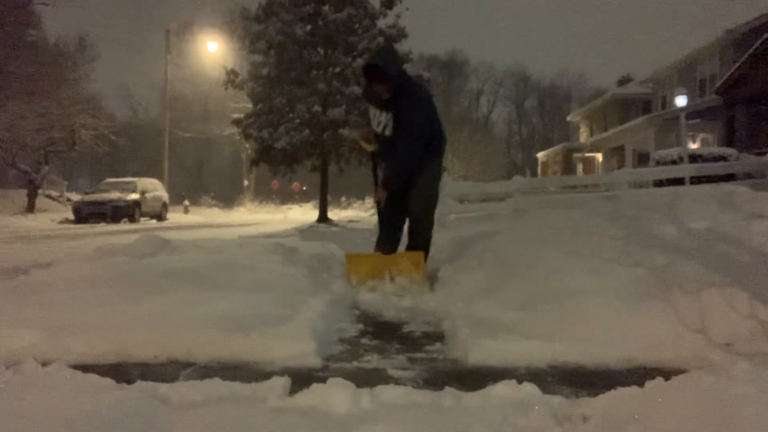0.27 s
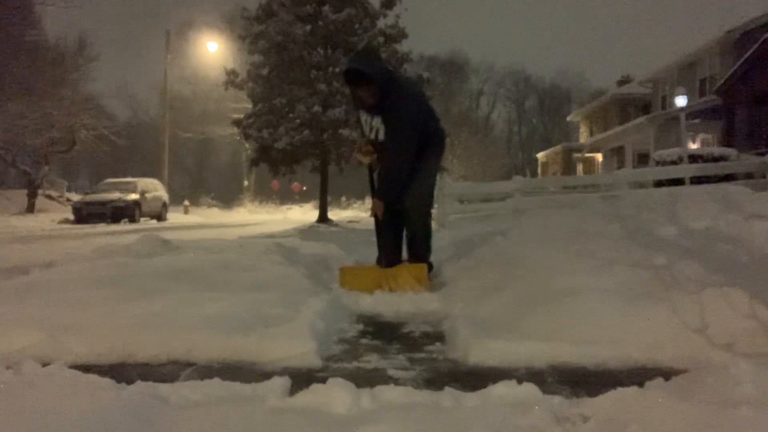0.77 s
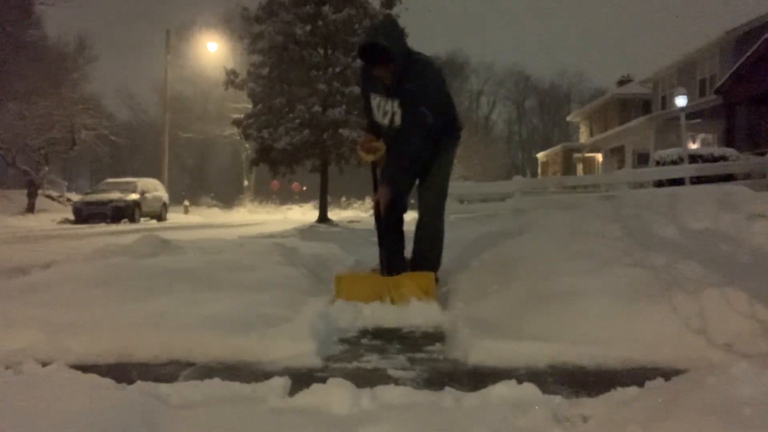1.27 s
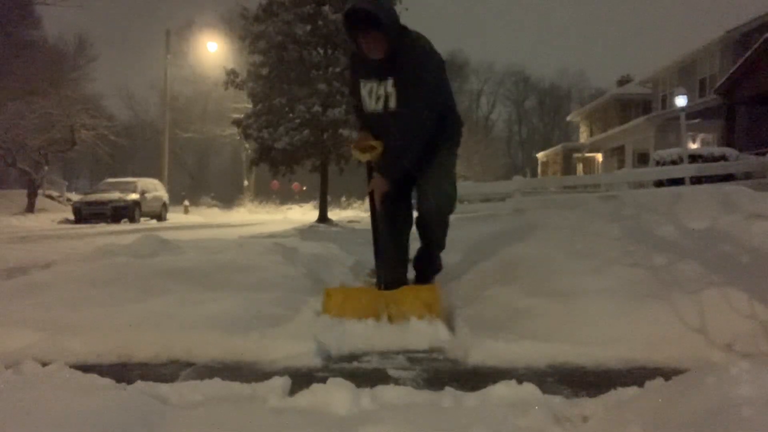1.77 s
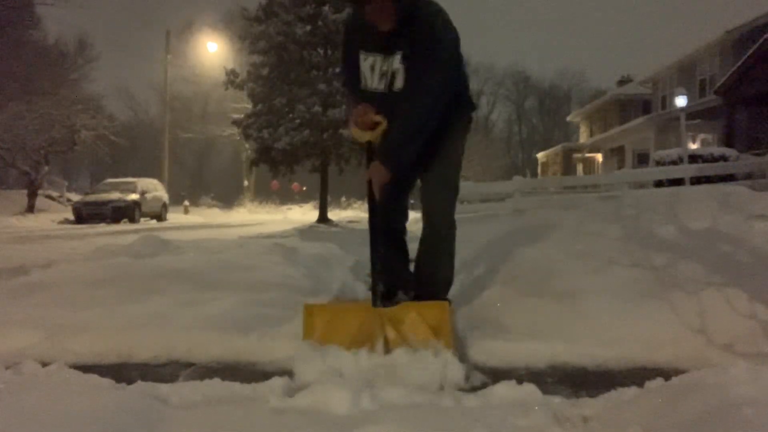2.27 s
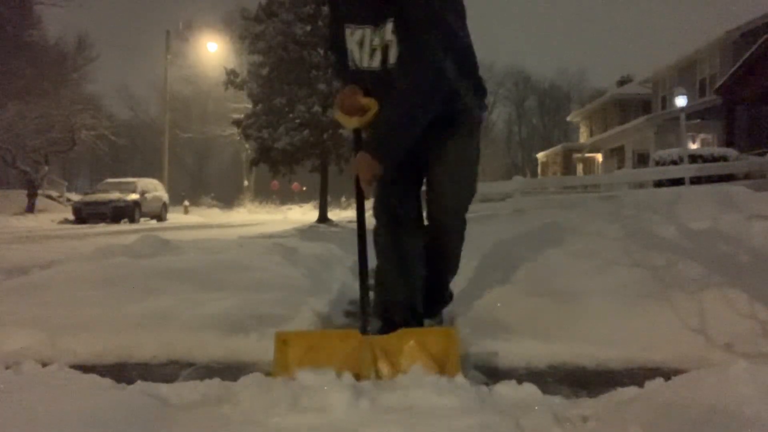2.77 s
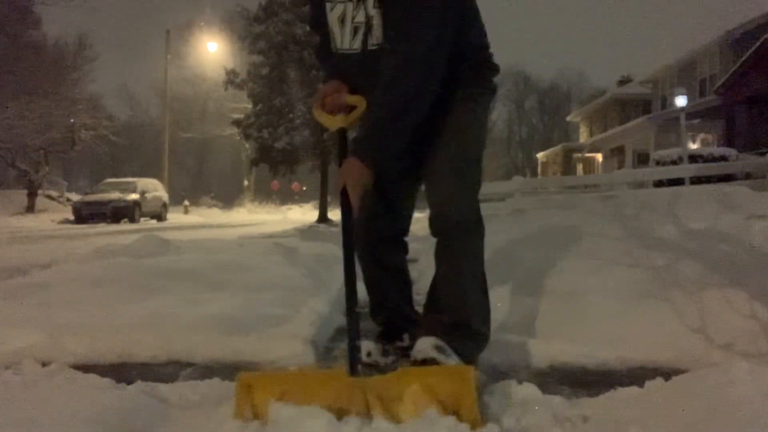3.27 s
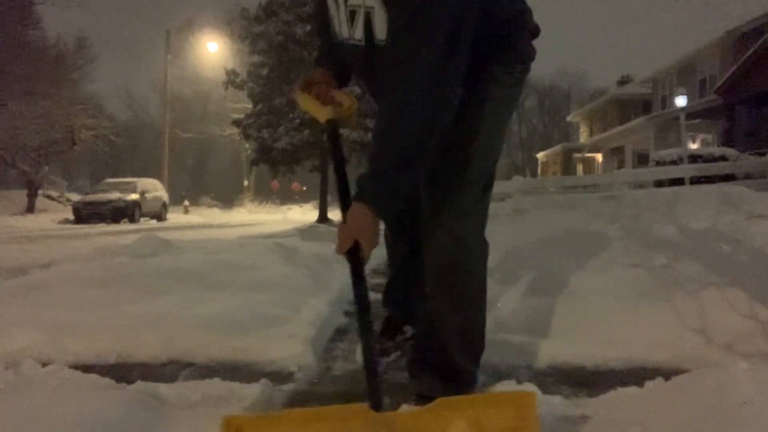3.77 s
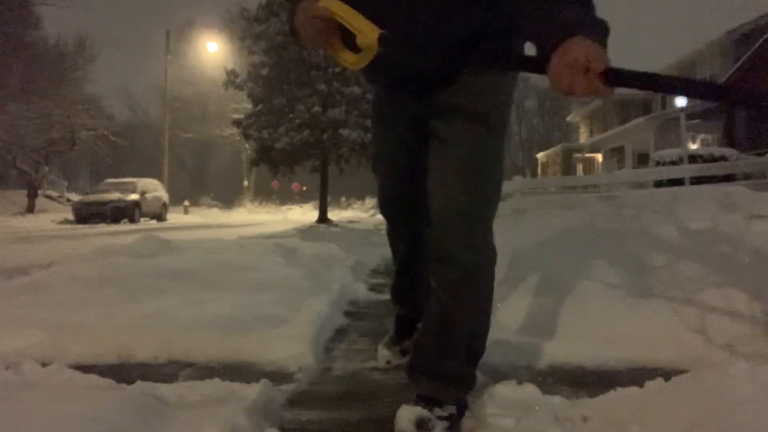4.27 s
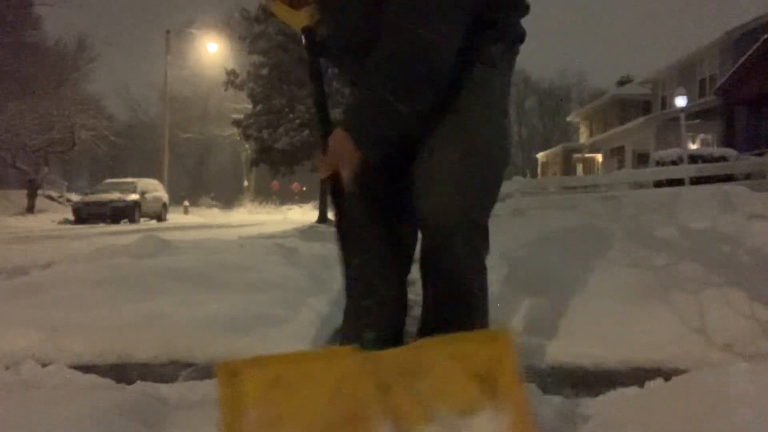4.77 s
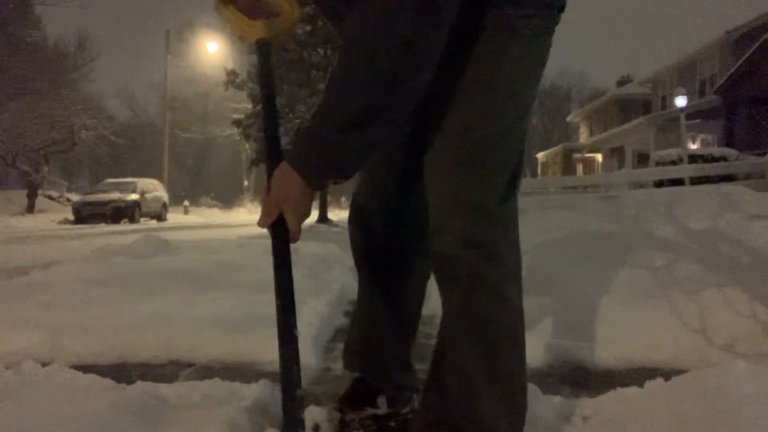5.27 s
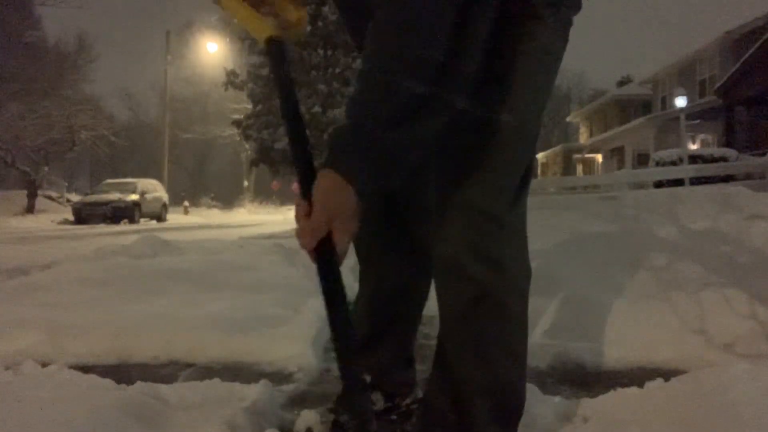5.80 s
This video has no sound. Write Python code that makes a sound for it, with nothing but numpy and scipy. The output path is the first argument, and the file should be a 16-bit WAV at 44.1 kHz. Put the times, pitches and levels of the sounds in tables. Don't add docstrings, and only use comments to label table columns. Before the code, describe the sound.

Outdoors on a quiet snowy night, a hollow plastic shovel is pushed towards a microphone near the ground. Short gritty scrapes with boxy knocks and crunching snow swell through the first three seconds, then taper. After a near-silent lift and toss, loose snow hisses, the blade lands, and two harsh scrapes grind very close by. Faint far traffic and soft low wind buffets lie underneath.

```python
import sys
import numpy as np
from scipy import signal
from scipy.fft import rfft, irfft, next_fast_len
from scipy.io import wavfile
from scipy.ndimage import uniform_filter1d

SR = 44100
rng = np.random.default_rng(int(sys.argv[2]) if len(sys.argv) > 2 else 0)


def makeup_ratio(level_db):
    decades = np.asarray(level_db, float) / 20
    return 10 ** decades


def unload_wav(signal):
    wavfile.write(
        sys.argv[1],
        SR,
        np.round(np.clip(np.atleast_2d(signal).T, -1, 1) * 32767).astype(np.int16),
    )


N = 266143
T = np.arange(N) / SR
SPAN = next_fast_len(N + 4096, True)
HZ = np.maximum(np.fft.rfftfreq(SPAN, 1 / SR), 1)


def unit(x):
    return x / np.sqrt(np.mean(x ** 2))


def across(table, column):
    table = np.array(table)
    return np.interp(np.log(HZ), np.log(table[:, 0]), table[:, column])


def over_time(table):
    return np.interp(T, *np.transpose(table))


def colour(x, table):
    cepstrum = irfft(np.log(makeup_ratio(across(table, column=1))), SPAN)
    cepstrum[1:SPAN // 2] *= 2
    cepstrum[SPAN // 2 + 1:] = 0
    return irfft(rfft(x, SPAN) * np.exp(rfft(cepstrum)), SPAN)[:N]


def walk(rate):
    hold = int(SR / rate)
    steps = np.repeat(rng.standard_normal(N // hold + 1), hold)
    return 1.47 * uniform_filter1d(uniform_filter1d(steps, hold), hold)[:N]


def ring(x, modes, wander_db, rate):
    out = 0
    for k, (hz, width, db) in enumerate(modes):
        drive = x * makeup_ratio(db + wander_db * walk(rate))
        out = out + (-1) ** k * signal.lfilter(*signal.iirpeak(hz, hz / width, SR), drive)
    return out


def fade(x, seconds):
    return signal.lfilter([1], [1, -np.exp(-1 / (max(seconds, 1e-4) * SR))], x)


def grains(rate, spread_db):
    when, size, sign = rng.random(N), rng.exponential(size=N), rng.standard_normal(N)
    return unit((when < rate / SR) * makeup_ratio(spread_db * size) * sign)


# (frequency [Hz], level [dB])
WIND = [(12, -37.5), (20, -21), (43, -5.5), (65, 0), (96, -5), (119, -13.5), (166, -39), (400, -63.5),
        (520, -81), (880, -120)]
# (time [s], level [dB])
GUSTS = [(0.0, -56), (1.09, -54), (1.12, -45), (1.58, -56), (1.75, -49), (2.18, -53.5), (2.43, -44.5),
         (2.54, -52), (2.97, -43), (3.01, -53), (3.74, -55.5), (3.88, -41.5), (4.06, -51), (5.0, -46.5),
         (5.09, -42.5), (5.17, -57), (5.54, -34), (6.03, -48.5)]


def wind():
    both, left, right = (unit(colour(rng.standard_normal(N), WIND)) * makeup_ratio(3.8 * walk(19)) for _ in range(3))
    return (0.2 * both + np.array([left, right])) * makeup_ratio(over_time(GUSTS) + 1.5)


# (frequency [Hz], level [dB])
TOWN = [(88, -44), (150, 1.5), (235, -13.5), (348, -15.5), (504, -20.5), (1140, -12), (2550, -33.5),
        (6910, -50.5), (9260, -51.5), (11500, -41.5), (16000, -32)]
# (time [s], level [dB])
TOWN_SWELL = [
    (0, 3.5),
    (1, 1),
    (3.8, 5),
    (4.6, 0.5),
    (6.03, 4.5),
]


def town():
    both, left, right = (unit(colour(rng.standard_normal(N), TOWN)) for _ in range(3))
    swell_db = over_time(TOWN_SWELL) + walk(2.3)
    return (0.9 * both + 1.04 * np.array([left, right])) * makeup_ratio(-65.5 + swell_db)


REST_DB = -77
# (start [s], end [s], effort at start [dB], effort at end [dB], grittiness [dB])
SHOVES = [(0.3, 0.5, -36, -32, -0.5), (0.52, 0.72, -36, -42, 0), (0.745, 0.86, -39, -32, -1.5),
          (0.86, 1.05, -36, -37, -1.5), (1.066, 1.31, -31.5, -33, 0.5), (1.345, 1.462, -43.5, -34.5, 1),
          (1.505, 1.545, -41, -33.5, 1.5), (1.57, 1.79, -32.5, -29.5, -0.5),
          (1.836, 1.88, -29, -39.5, -2.5), (2.032, 2.135, -49.5, -48.5, -19), (2.164, 2.365, -31, -38, -1),
          (2.37, 2.5, -31.5, -33, -4.5), (2.528, 2.545, -44, -48, 4), (2.566, 2.6, -40.5, -23.5, 3),
          (2.6, 2.88, -26.5, -23, 0.5), (2.88, 3.02, -22, -37.5, -1), (3.02, 3.15, -31, -30.5, -2),
          (3.185, 3.37, -28, -32.5, -1.5), (3.415, 3.505, -37.5, -42.5, -1.5),
          (3.52, 3.75, -53.5, -64.5, 3)]
# (start [s], end [s], effort at start [dB], effort at end [dB], grittiness [dB])
SCRAPES = [(4.217, 4.248, -56.5, -60, 5), (4.651, 4.792, -52, -64.5, 2.5), (4.843, 4.91, -55.5, -45.5, 3),
           (4.919, 5.0, -28, -21, 9), (5.003, 5.127, -21.5, -20.5, 6.5), (5.127, 5.205, -23, -40.5, 4.5),
           (5.22, 5.365, -54.5, -48, 6.5), (5.373, 5.402, -29.5, -20.5, 4), (5.404, 5.44, -17, -25, 5),
           (5.459, 5.57, -22.5, -31.5, 1), (5.566, 5.817, -34, -40.5, 3), (5.85, 6.02, -55.5, -68, -1)]


def effort():
    bite_db_per_s, lift_db_per_s = 1100, 802
    start, end, first_db, last_db, grit_db = np.vstack([SHOVES, SCRAPES]).T[:, :, None]
    s = T[::32]
    hold_db = first_db + (last_db - first_db) * np.clip((s - start) / (end - start), 0, 1)
    bite_db = bite_db_per_s * np.maximum(start - s, 0)
    lift_db = lift_db_per_s * np.maximum(s - end, 0)
    each_db = hold_db - bite_db - lift_db
    gritty_db = uniform_filter1d(grit_db[each_db.argmax(axis=0), 0], size=18)
    push_db = np.maximum(each_db.max(axis=0), REST_DB)
    return np.interp(T, s, push_db), np.interp(T, s, gritty_db)


def slips(rate, seconds, rub):
    return rub + unit(fade(np.abs(grains(rate, 3.5)), seconds))


# (time [s], peak [dB], crunch against peak [dB])
CATCHES = [(0.306, -42, -27), (0.486, -38.5, -25), (0.63, -34.5, -5), (0.804, -34, -16),
           (0.932, -32.5, -4.5), (1.344, -37.5, -17), (1.395, -38, -18), (1.504, -38.5, -14),
           (1.524, -33, -11), (1.568, -28, -6), (1.833, -34, -26), (2.152, -45, -2), (2.245, -35.5, 0),
           (2.528, -39.5, 6), (2.565, -35, -1.5), (2.734, -25.5, -2), (2.923, -26.5, -5),
           (3.171, -28.5, -24), (3.222, -29.5, -30), (3.412, -25, -23), (3.488, -33.5, -13),
           (4.219, -57.5, 16.5), (4.912, -24, -0.5), (4.965, -28.5, 3.5), (4.997, -22, 0.5),
           (5.036, -26, -2), (5.061, -23.5, 0.5), (5.374, -25, -17), (5.431, -26, -6), (5.778, -31, -24)]
# (time [s], peak [dB])
TICKS = [(1.165, -31), (1.205, -34.5), (1.37, -34.5), (1.539, -33), (1.785, -37), (2.308, -45),
         (2.357, -32), (2.445, -34), (2.889, -32), (3.065, -34), (4.159, -66), (4.235, -56), (4.843, -52),
         (5.125, -36), (5.815, -36)]
KNOCKS = CATCHES + [(s, db, -5.5) for s, db in TICKS]
# (time [s], scoop level [dB], shaft level [dB])
THUMPS = [(0.305, -31.5, -68), (0.465, -20, -39), (0.486, -21, -41), (0.838, -24.5, -49),
          (1.068, -32.5, -23), (1.368, -22, -45), (1.695, -14.5, -48), (1.749, -41, -26.5),
          (2.032, -41, -35), (2.246, -29, -59.5), (2.601, -18.5, -48), (2.733, -26, -19), (2.764, -12, -36),
          (2.889, -31, -37), (3.221, -25, -41), (3.532, -32.5, -59), (4.22, -37, -50), (4.234, -61.5, -38),
          (4.649, -34.5, -57), (4.838, -70, -41.5), (4.912, -30, -25), (4.965, -24, -42.5),
          (4.998, -12, -47), (5.038, -9, -26), (5.127, -26.5, -37), (5.394, -26, -37)]


def bursts(db, click, seconds):
    when = np.concatenate([np.transpose(KNOCKS)[0], np.transpose(THUMPS)[0]])
    hits = np.bincount((when * SR).astype(int), makeup_ratio(db), N)
    return fade(hits, seconds) * rng.standard_normal(N) + click * hits


# (frequency [Hz], width [Hz], level [dB])
SHAFT = [(134, 58, 0)]


def shaft(x):
    return ring(x, SHAFT, 0.91, 10.5)


# (frequency [Hz], width [Hz], level [dB])
SCOOP = [(173.7, 51.4, -6), (215, 54, -4.5), (301.2, 33.2, 0.5), (329.7, 25.4, 2.5), (373.5, 41.7, -0.5),
         (452.7, 38, 2), (526, 77.4, -2), (688, 52.3, -2), (705, 70, -3), (880, 156, -13),
         (388, 154, -10.5)]


def scoop(x):
    return ring(x, SCOOP, 1.94, 20.464)


# (frequency [Hz], width [Hz], level [dB])
EDGE = [(1020, 370, 1.5), (1538, 203, 3.5), (1736, 160, -0.5), (2214, 560, -2.5)]
# (frequency [Hz], width [Hz], level [dB])
LIP_FLAT = [(1780, 100, 1.5), (3093, 280, -1.5)]
# (frequency [Hz], width [Hz], level [dB])
LIP_STEEP = [(1916, 840, -6), (4590, 170, -12.5)]
# (time [s], steepness [0-1])
STEEP = [
    (0, 0),
    (1.9, 0.55),
    (2.5, 0.37),
    (3.5, 0.92),
    (6.03, 0.83),
]


def lip(x):
    steep = np.clip(over_time(STEEP), 0, 1)
    flat_ring = ring(x * (1 - steep), LIP_FLAT, 1.5, 45)
    steep_ring = ring(x * steep, LIP_STEEP, 1.7, 45)
    return ring(x, EDGE, 2.23, 45) + 1.21 * flat_ring + 0.79 * steep_ring


# (frequency [Hz], level [dB])
CRUNCH = [(1700, -13.5), (2600, 3.5), (3500, -0.5), (4400, 2), (5500, -3), (7000, -6.5), (8500, -1.5),
          (10000, -48.5)]
# (frequency [Hz], width [Hz], level [dB])
RIM = [(2880, 170, -3), (3620, 61, -4.5), (4320, 365, 2), (4910, 71, 0.5), (5700, 97, -3), (6460, 83, -5)]


def crunch(x):
    clumps = ring(x, [(hz, 0.31 * hz, 0) for hz, _ in CRUNCH], 1.76, 40)
    return colour(clumps, CRUNCH) + 0.55 * ring(x, RIM, 3.2, 35)


# (frequency [Hz], level [dB])
HISS = [(5000, -6.5), (7500, 0), (9000, -6.5), (10200, 3), (12000, -2.5), (14000, 1), (16000, -10)]


def spray(x):
    return colour(x, HISS)


# (time [s], fine hiss [dB], coarse lumps against hiss [dB])
LOOSE = [(0, -99, -2), (0.28, -84, 9), (0.37, -69.5, 16.5), (1.5, -72, 3), (2.05, -64.5, 3.5),
         (2.55, -66.5, 9), (3.6, -66.5, 8), (3.95, -74, 1.5), (4.17, -64.5, -25), (4.25, -61.5, -8),
         (4.37, -94.5, -9), (4.625, -90, -8), (4.65, -58.5, -12), (4.8, -80, 7), (4.85, -47.5, -2.5),
         (5.25, -61, 8.5), (5.8, -71, 8), (6.03, -68, -0.5)]


def shovel(judder):
    push_db, gritty_db = effort()
    s, fine_db, coarse_db = np.transpose(LOOSE)
    fine_db, coarse_db = np.interp(T, s, fine_db), np.interp(T, s, fine_db + coarse_db)
    touch = np.clip((push_db + 62) / 16, 0, 1)
    down = np.clip((push_db - REST_DB) / 24, 0, 1)

    def layer(under_db, share, loose_db):
        usual_db = -36
        pushed = down * makeup_ratio(usual_db + under_db + share * (push_db - usual_db))
        return np.hypot(pushed, makeup_ratio(loose_db))

    rasp = layer(-7 + 0.45 * gritty_db, 0.79, coarse_db - 0.5)
    crush = layer(-17 + gritty_db, 0.77, coarse_db)
    hiss = layer(-34 + 2 * gritty_db, 0.66, fine_db)

    _, peak_db, crack_db = np.transpose(KNOCKS)
    _, scoop_db, shaft_db = np.transpose(THUMPS)
    thud_db = np.r_[peak_db - 17, shaft_db]
    thump_db = np.r_[peak_db - 3, scoop_db]
    edge_db = np.r_[peak_db, scoop_db - 16]
    snap_db = np.r_[peak_db + crack_db, scoop_db - 33]

    parts = (
        (shaft, makeup_ratio(push_db - 16.5), (thud_db - 5.5, 14.0, 0.006), 0.4, 0.3, 1.5, grains(500, 0.93)),
        (scoop, makeup_ratio(push_db), (thump_db - 8.0, 12.0, 0.005), 0.6, 0.2, 1.3, grains(900, 1.26)),
        (lip, rasp, (edge_db + 0.5, 6.0, 0.004), 0.6, 0.3, 1.3, grains(3000, 0.86)),
        (crunch, crush, (snap_db + 0.2, 4.0, 0.004), 0.55, 0.45, 1.5, grains(6000, 1.35)),
        (spray, hiss * makeup_ratio(4.5), (snap_db - 8.0, 4.0, 0.003), 0.45, 0.4, 1.2, grains(9800, 1.1)))
    out = 0
    for body, level, knock, jerky, own, patchy_db, grit in parts:
        jerks = judder ** jerky * slips(190, 0.0027, 1.0) ** own
        jolts = jerks ** touch * makeup_ratio(patchy_db * walk(25))
        rub = np.sqrt(touch) * grit + np.sqrt(1 - touch) * rng.standard_normal(N)
        drag = jolts / np.sqrt(uniform_filter1d(jolts ** 2, size=3000)) * level
        out = out + body(rub * drag + bursts(*knock)) / np.std(body(grit))
    return signal.sosfilt(signal.butter(2, 70, "high", fs=SR, output="sos"), out)


# (time [s], level [dB], frequency [Hz], length [s])
SQUEAKS = [
    (4.393, -69.5, 3120, 0.017),
    (4.44, -75, 2920, 0.013),
]


def sleeve():
    cloth = rng.standard_normal(N)
    out = 0
    for s, db, hz, length in SQUEAKS:
        squeak = unit(ring(cloth, [(hz, 250, 0)], 0, 20))
        out = out + makeup_ratio(db) * squeak * np.exp(-((T - s) / length) ** 2)
    return out


# (frequency [Hz], left lag [rad], left minus right [dB], share heard alike [0-1])
PORTS = [(60, 0.01, 4.5, 0.95), (130, .1, 3, 1), (197, 0.15, 4.5, 1), (401, 0.18, 3, 0.95),
         (860, 0.82, 1, 0.88), (1390, 0.27, -1.5, 0.83), (1920, 0.53, -1.5, 0.88), (2880, 0.82, -1.3, 0.58),
         (4200, 0.8, -0.7, 0.56), (5190, 1.7, -2, 0), (7650, 4.2, -1, 0.72), (8900, 2.5, -12.5, 0.1),
         (10000, 2.4, -0.5, 0.35), (11500, 5, 0.5, 1), (13000, 5.8, -2, 0.7), (16000, 6.28, 10, 0.7)]


def ports(alike, apart):
    lag, tilt_db, share = (across(PORTS, column=k) for k in (1, 2, 3))
    share = np.clip(share, 0, 1)
    mid = rfft(alike, SPAN) * np.sqrt((1 + share) / 2)
    side = rfft(apart, SPAN) * np.sqrt((1 - share) / 2)
    left = (mid + side) * makeup_ratio(tilt_db / 2) * np.exp(-1j * lag)
    right = (mid - side) * makeup_ratio(-tilt_db / 2)
    return irfft(np.array([left, right]), SPAN)[:, :N]


# (time [s], frequency [Hz])
SUM_GAP_HZ = [
    (0, 7110),
    (1.9, 7080),
    (2.6, 8230),
    (6.03, 7700),
]
SHARP_S = [1.545, 2.56, 2.705, 3.41, 3.49, 4.23, 4.65, 4.69]


def thin_stereo(dry):
    hz, s, (total, gap) = signal.stft([dry[0] + dry[1], dry[0] - dry[1]], SR, nperseg=1024)
    wander = np.repeat(rng.exponential(size=(3, len(s) // 4 + 1)), 4, axis=1)[:, :len(s)]
    steady = np.abs(s[:, None] - SHARP_S).min(axis=1) > 0.009
    early = s < 2.4
    low_hz = np.interp(s, *np.transpose(SUM_GAP_HZ)) + (150 + 200 * early) * (wander[0] - 1)
    high_hz = 10250 + (60 + 400 * early) * wander[1]
    difference_top_hz = 12500 - 60 + 150 * wander[2]
    hz = hz[:, None]
    total[(hz > low_hz) & (hz < high_hz) & steady] = 0
    gap[(hz > difference_top_hz) & steady] = 0
    total[(hz > 15800) & steady] = 0
    return signal.istft([total + gap, total - gap], SR, nperseg=1024)[1][:, :N] / 2


def scene():
    judder = slips(80, 0.0068, 1.0)
    return ports(shovel(judder) + sleeve(), shovel(judder)) + wind() + town()


def roll_off(x):
    return signal.sosfilt(signal.butter(12, 16650, fs=SR, output="sos"), x)


def record(dry):
    mix = thin_stereo(dry)
    return roll_off(mix)


dry = scene()
out = record(dry)
unload_wav(out)
```